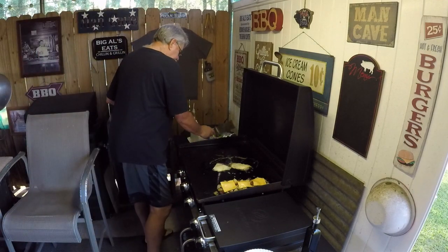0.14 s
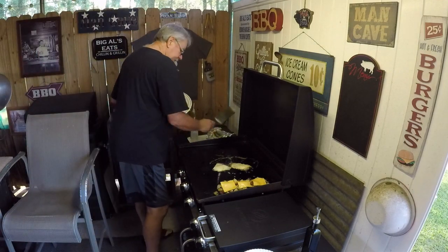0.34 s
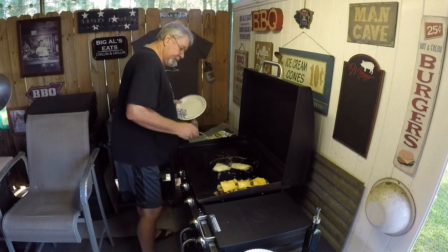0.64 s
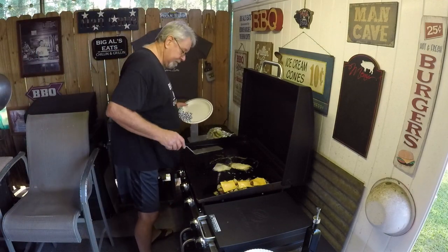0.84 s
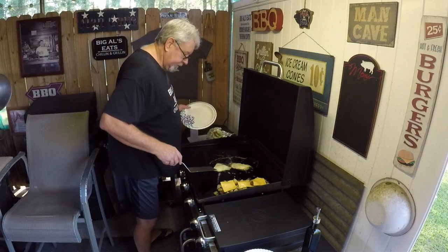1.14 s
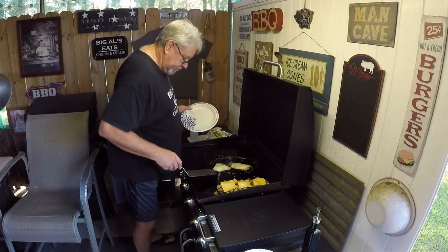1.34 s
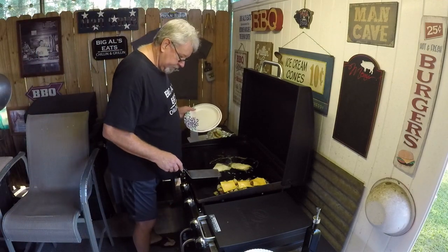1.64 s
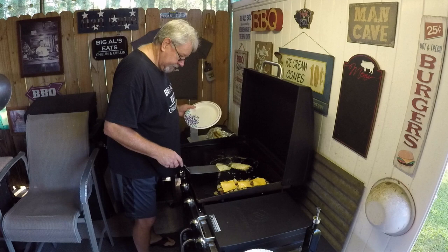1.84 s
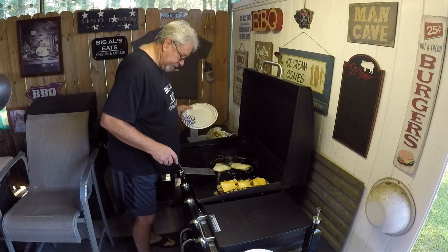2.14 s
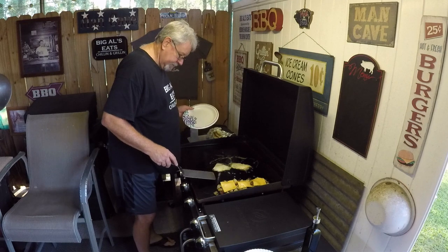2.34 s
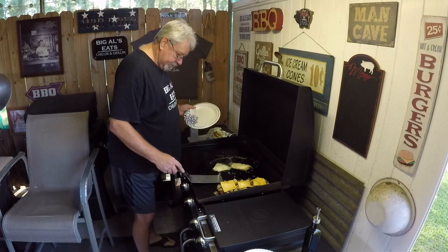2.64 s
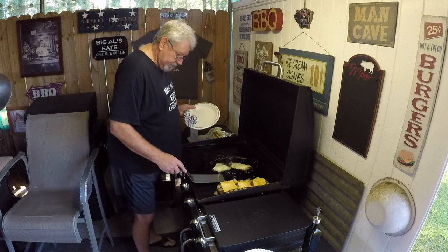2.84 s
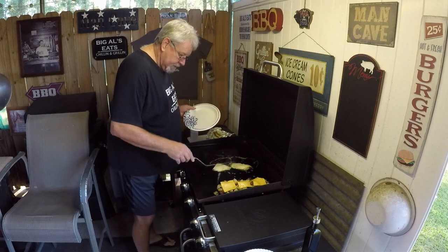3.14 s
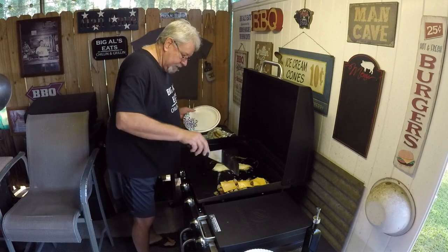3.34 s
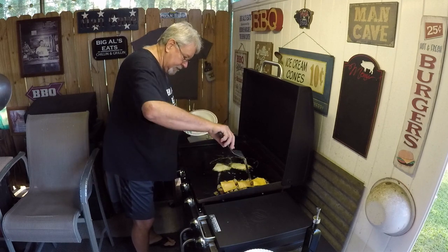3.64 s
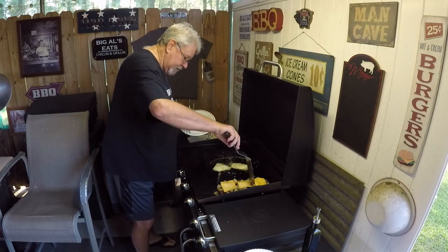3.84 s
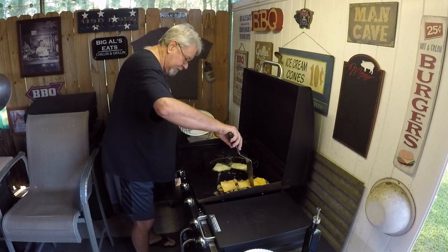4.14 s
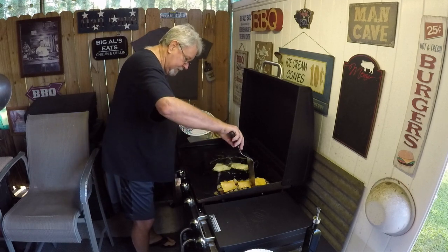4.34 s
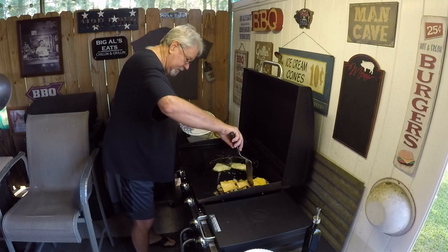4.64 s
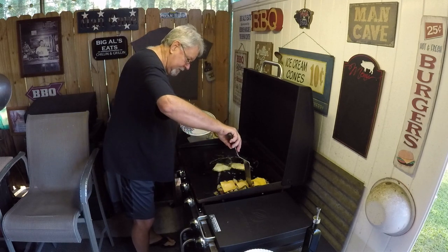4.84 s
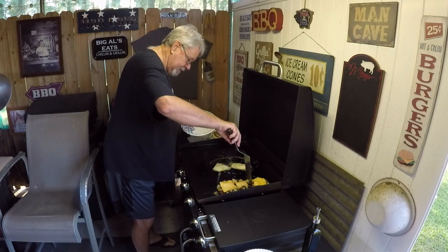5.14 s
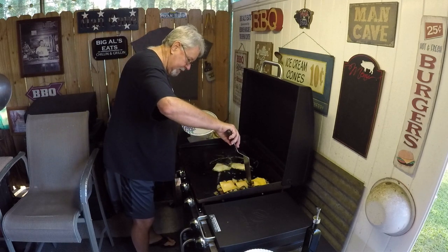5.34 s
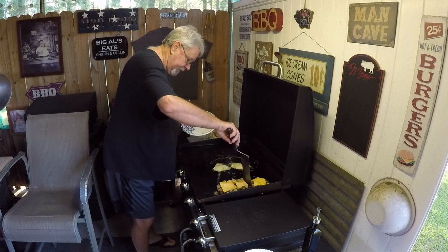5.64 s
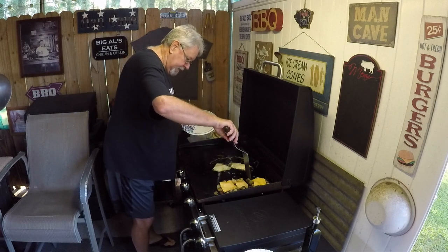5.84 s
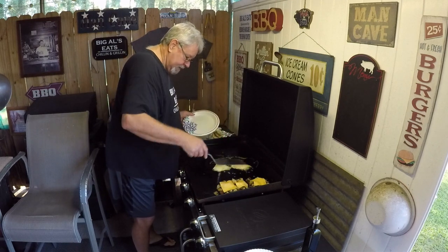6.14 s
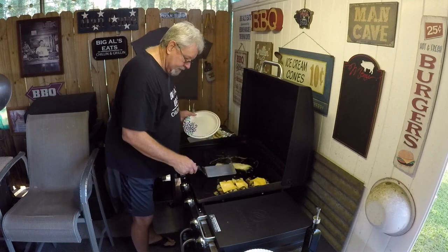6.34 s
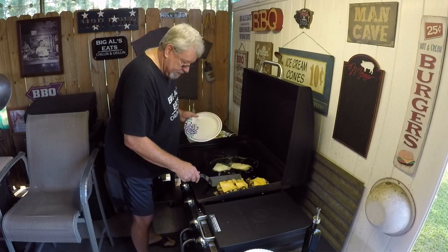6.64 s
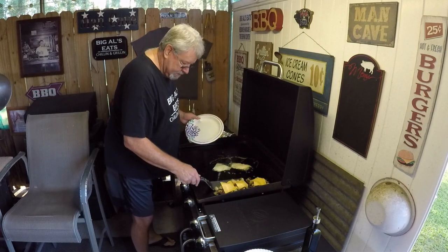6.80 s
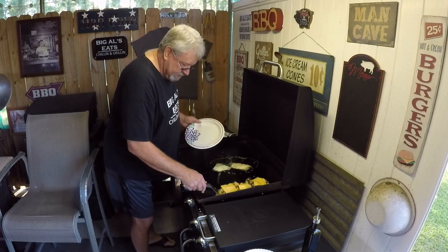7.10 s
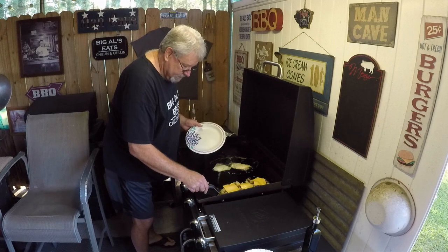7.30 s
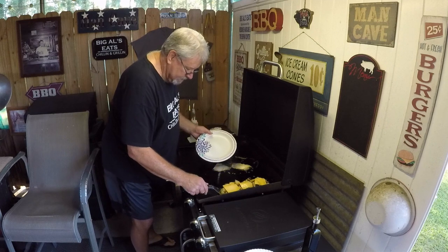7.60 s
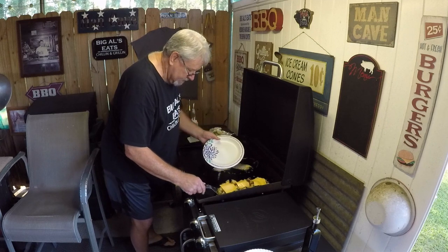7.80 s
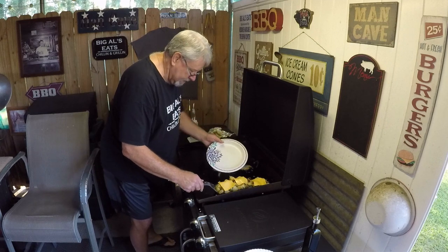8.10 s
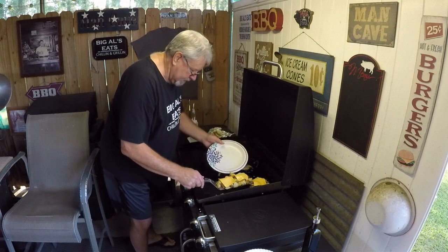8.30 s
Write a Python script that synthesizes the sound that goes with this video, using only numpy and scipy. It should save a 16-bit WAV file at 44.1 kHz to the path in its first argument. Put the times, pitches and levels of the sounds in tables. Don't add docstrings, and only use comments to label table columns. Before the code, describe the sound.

Low gas flame hum and crackling grease under a porch roof, broken by metal blade taps, gritty scrapes and hollow booms.

```python
import sys
import numpy as np
from scipy import signal
from scipy.fft import rfft, irfft, next_fast_len
from scipy.io import wavfile
from scipy.ndimage import uniform_filter1d, map_coordinates

SR = 44100
rng = np.random.default_rng(int(sys.argv[2]) if len(sys.argv) > 2 else 0)


def put_to_file(sound):
    columns = np.atleast_2d(sound).T
    safe = np.clip(columns, -1, 1)
    whole_steps = np.round(safe * 32767)
    wavfile.write(sys.argv[1], SR, whole_steps.astype(np.int16))


def decibels_to_gain(level_db):
    exponent = np.asarray(level_db, float) / 20
    return 10 ** exponent


N = 373086

# start of full pressure in seconds, seconds to gain 20 dB,
# seconds to lose 20 dB, rasp level in dB, sharpness of the edge in dB.
STROKES = [(2.538, .015, 0.1, -40.5, -8.5), (2.642, .01, .12, -36.5, -17), (4.738, .015, .06, -39, -12),
           (4.875, .06, .08, -43, -13), (6.416, 0.02, .09, -30, -3), (6.46, .03, .14, -28, -11),
           (6.56, .1, .15, -29.5, -9.5), (6.63, .13, 0.2234, -26, -10), (6.875, 0.11, .13, -25.5, -8.5),
           (7.12, .5, 0.14, -41, -6), (7.335, 0.2, .12, -47, -8)]
# pitch in Hz, level in dB, seconds to die by 60 dB.
FRONT = [(349.4, -12, 0.29), (545, 0.5, 0.32), (654, -10, 0.54), (713, -9.5, .43), (936, -14, .26),
         (1060, -20.5, .45), (1405, -26.5, .5)]
BACK = [(295.4, -12, .4), (370, -12, 0.45), (486, 0.5, .3), (742, -9.5, 0.57), (993, -16, 0.31),
        (1068, -23, 0.26), (1303, -27, .25), (1500, -31, .25), (1980, -32, .2)]
MIDDLE = [(443.4, 0, 0.47), (800, -9, 0.36), (1085, -14.5, .35), (1310, -19, .4), (1384, -16.5, .33),
          (1860, -23, .4), (2100, -24.5, 0.26)]
SHELL = [(360.4, -1, .28), (391.6, -2.5, 0.46), (559, 0, 0.44)]


def unit(x):
    return x / np.sqrt(np.mean(x ** 2) + 1e-20)


def along(points, hz):
    f, v = np.transpose(points)
    return np.interp(np.log(hz + 1), np.log(f + 1), v)


def curves(rows):
    s, *cols = np.transpose(rows)
    return np.array([np.interp(np.arange(N) / SR, s, c) for c in cols])


def wobble(rate, count=N):
    knots = rng.standard_normal(int(count * rate / SR) + 4)
    return map_coordinates(knots, [np.arange(count) * rate / SR])


def filtered(x, response):
    m = next_fast_len(N + 8192)
    return irfft(rfft(x, m) * response(np.fft.rfftfreq(m, 1 / SR)), m)[..., :N]


def peaks(modes, f):
    return np.sqrt(sum(decibels_to_gain(2 * db) / (1 + (2 * (f - hz) / w) ** 2) ** 2 for hz, w, db in modes))


def noise(patchy_db, size=8):
    z = signal.stft(rng.standard_normal((2, N)), nperseg=512)[2]
    field = uniform_filter1d(rng.standard_normal(z.shape[1:]), size, 0)
    field = uniform_filter1d(field, 8, 1)
    return signal.istft(z * decibels_to_gain(patchy_db * unit(field)), nperseg=512)[1][:, :N]


def grit(rate, spread_db, patchy_db):
    bumps = (rng.random(N) < rate / SR) * decibels_to_gain(spread_db * rng.exponential(size=N))
    grains = signal.lfilter([1], [1, -.97], bumps)
    return noise(patchy_db, size=2) * (1 + 0.31 * grains)


def taps():
    # start in seconds, peak in dB, brightness in dB, level of the free ring in dB,
    # seconds until it is damped.
    landings = [
        (2.5316, -29.5, -20, -1.5, 0.11),
        (2.6375, -28, -14, -7, .06),
        (4.7274, -36, -14, -13, .05),
        (6.4157, -22, -4, -6.5, .08),
    ]
    # pitch in Hz, level in dB, seconds to die by 60 dB.
    blade_tones = [(783, 2, .5), (1723, 1.5, 1.1), (2180, -18, 0.45), (2309, -11, .4), (2650, -11, .3),
                   (2940, -7, .2), (3260, -8, .15), (3774, -16, .3), (4797, -15, .15), (5900, -3, 0.14),
                   (6702, -16, .15), (9400, -18, .1)]
    out, t = np.zeros(N), np.arange(SR // 2) / SR
    for s, db, bright_db, ring_db, free in landings:
        ring = np.zeros(len(t))
        for hz, level, t60 in blade_tones:
            tone_db = level + rng.normal(0, 1.5) + (bright_db + 9.5) * np.log2(hz / 2000) / 2
            ring += decibels_to_gain(tone_db - 60 * t / t60) * np.sin(2 * np.pi * hz * t)
        damped = decibels_to_gain(ring_db - 60 * np.maximum(t - free, 0) / .06)
        jolt = decibels_to_gain(-60 * t / 0.037) * rng.standard_normal(len(t))
        dull = signal.lfilter(*signal.butter(1, [900, 4000], "band", fs=SR), jolt)
        crack = 1.3 * dull + 0.69 * decibels_to_gain(bright_db) * jolt
        out[round(s * SR):][:len(t)] += decibels_to_gain(db - 8) * (ring * damped + crack)
    return out


def pressure(peak_db, lingers):
    s, rise, fall = np.transpose(STROKES)[:3, :, None]
    late = np.arange(0, N, 16) / SR - s
    hold = 0.32
    drop = np.maximum(-late / rise, np.maximum(late / fall - hold, 0) / lingers)
    gains = decibels_to_gain(peak_db[:, None] - 20 * drop)
    return np.repeat(np.linalg.norm(gains, axis=0), 16)[:N]


def scrape():
    # pitch in Hz, width in Hz, level in dB.
    plate = [(1020, 80, 3), (1240, 50, -4), (1306, 44, 6), (1404, 52, 8.5), (1510, 88, 1.5), (1835, 77, 2),
             (1990, 50, -10), (2220, 44, -17), (2470, 72, -15.5)]
    blade = [(3400, 110, -2), (4340, 280, -5.5), (4800, 30, -4), (5100, 32, 2), (5320, 26, -15),
             (5610, 18, -14), (5700, 60, 0), (6370, 34, -4), (6690, 43, 1), (7470, 43, -1)]
    rasp_db, sharp_db = np.transpose(STROKES)[3:]
    rattle_db = rasp_db - 12 - 1.64 * sharp_db
    body = lambda f: peaks([(362, 154, -6), (553, 280, 0.0), (800, 240, -8.0)], f)
    rasp = lambda f: np.hypot(peaks(plate, f), peaks([(1190, 800, 0.0), (1890, 1340, -5.5)], f))
    edge = lambda f: np.hypot(peaks(blade, f), peaks([(3800, 3200, -4.0), (6400, 4300, -6.5)], f))
    judder = decibels_to_gain(1.3 * wobble(30))
    body_part = pressure(rattle_db, 2.7) * unit(filtered(grit(200, 1.9, 2.5), body))
    plate_part = pressure(rasp_db, 1) * judder * unit(filtered(grit(500, 1.2, 2.1), rasp))
    edge_part = pressure(rasp_db + sharp_db, 0.55) * judder * unit(filtered(grit(600, 1.2, 2.4), edge))
    return body_part + plate_part + edge_part


def booms():
    # start in seconds, level in dB, tilt in dB an octave about 500 Hz, rise in seconds,
    # panels that are woken.
    knocks = [(1.16, -12, 0, 0.014, SHELL[2:]), (2.637, -13, 1.5, .007, FRONT),
              (2.69, -14.5, -23, .012, FRONT), (2.735, -13.5, 2, .01, FRONT[1:]),
              (2.78, -14.5, 1, 0.0091, SHELL[2:]), (4.722, -9, -0.5, .008, BACK),
              (4.775, -18, -20, 0.013, BACK), (4.862, -13.5, 5.5, 0.014, BACK[:6]),
              (6.418, -13, 1, .006, MIDDLE), (6.457, -21, 8, .01, MIDDLE), (6.515, -22, -25, .012, SHELL),
              (6.585, -18, -12, 0.007, SHELL), (6.66, -12.5, 10, .02, SHELL), (6.73, -16, 6, .01, SHELL),
              (6.86, -26, 5, .02, MIDDLE[1:])]
    out, t = np.zeros(N), np.arange(SR // 2) / SR
    for s, db, tilt_db, rise, panels in knocks:
        for hz, level, t60 in panels:
            tone = np.sin(2 * np.pi * hz * t + 0.76 * wobble(29.8, len(t)))
            flutter = decibels_to_gain(2.74 * wobble(34.4, len(t))) * tone
            strength_db = db + level + tilt_db * np.log2(hz / 500)
            swell = decibels_to_gain(strength_db - 60 * t / t60) * (1 - np.exp(-t / rise))
            out[round(s * SR):][:len(t)] += swell * flutter
    return out


def fat():
    # frequency in Hz, level in dB per Hz.
    colour = [(1500, -18), (3000, -2.5), (4400, -6.5), (5200, 0.5), (7700, 0.5), (8100, -1.5), (10000, -5),
              (13000, -14.5), (15500, -34)]
    # time in seconds, level in dB.
    heat = [(0, -56), (5.2, -56), (5.7, -54), (6.3, -54.5), (6.7, -51.5), (7.3, -56), (8.46, -56.5)]
    # start in seconds, peak in dB, middle frequency in Hz, seconds to die by 60 dB, click in dB.
    spits = [(.74, -45, 5000, 0.11, -9), (1.44, -47, 3000, .1, -9), (2.06, -46, 3600, .08, -9),
             (3.15, -46, 3800, .06, -9), (3.66, -49.5, 5000, .1, -9), (4.595, -43, 7300, 0.13, -6),
             (5.048, -49, 6050, .12, -6), (5.17, -51, 8500, .2, -9), (5.502, -38, 7260, .12, 0),
             (5.546, -47.5, 7500, .3, -9), (5.843, -40, 5000, 0.059, -2), (5.97, -47, 6000, .08, -6),
             (6.113, -48, 7800, .1, 0), (6.19, -50, 10000, 0.055, -9), (7.53, -49, 6800, .12, -6),
             (7.748, -48, 7000, 0.11, -3)]
    sizzle = unit(filtered(grit(300, 1.1, 1.5), lambda f: decibels_to_gain(along(colour, f))))
    out = decibels_to_gain(curves(heat)[0] + 3.0 + 0.64 * wobble(6.9)) * sizzle
    t = np.arange(SR // 4) / SR
    snap = signal.butter(1, [2800, 8000], "band", fs=SR)
    for s, db, hz, t60, click_db in spits:
        swell = decibels_to_gain(3.5 * wobble(205, len(t)) - 60 * t / t60) * (1 - np.exp(-t / 0.0038))
        band = signal.butter(2, [0.77 * hz, 1.2 * hz], "band", fs=SR)
        puff = signal.lfilter(*band, rng.standard_normal((2, len(t))) * swell)
        burst = decibels_to_gain(click_db + 7 - 60 * t / 0.0065) * rng.standard_normal(len(t))
        click = signal.lfilter(*snap, burst)
        out[:, round(s * SR):][:, :len(t)] += decibels_to_gain(db) * (3 * puff + click)
    return out


def burner():
    # pitch in Hz, width in Hz, level in dB.
    casing = [(156.5, 20.5, -3.5), (206.8, 21.4, 0), (230.3, 22.2, -1), (295.7, 23, -9.5), (369, 18.6, -12),
              (474, 78, -15.5), (544, 52, -9), (604.4, 46, -11), (735, 33, -18.5)]
    # frequency in Hz, level in dB per Hz.
    air = [(100, -25), (135, -27), (260, -14), (500, -15.5), (800, -20.5), (1000, -27.5), (1500, -37.5),
           (1950, -41.5), (2500, -54), (3500, -54.5), (4500, -58), (6000, -71)]
    shape = lambda f: np.hypot(peaks(casing, f), decibels_to_gain(along(air, f)))
    level_db = -20 + 0.53 * wobble(2.505)
    return decibels_to_gain(level_db) * unit(filtered(noise(0.67), shape))


def porch(x):
    # frequency in Hz, seconds to die by 60 dB.
    fading = [(200, 0.47), (2000, 0.33), (10000, 0.18)]
    hz, t, z = signal.stft(rng.standard_normal((2, SR // 2)), SR, nperseg=256)
    tail = signal.istft(z * decibels_to_gain(-60 * t / along(fading, hz)[:, None]), SR, nperseg=256)[1]
    return signal.fftconvolve(np.atleast_2d(x), tail / np.linalg.norm(tail[0]), axes=1)[:, :N]


def scene():
    hits, drag = taps() + booms(), scrape()
    echoes = decibels_to_gain(-8.5) * porch(hits) + decibels_to_gain(-7) * porch(drag)
    return hits + drag + fat() + burner() + echoes


def low_pass(x):
    return signal.sosfilt(signal.butter(12, 15480, fs=SR, output="sos"), x)


def record(dry):
    # frequency in Hz, gain in dB.
    band = [(90, -46), (120, -17), (140, -5), (150, 0), (13000, -0.5), (14250, -6), (14400, -14),
            (15400, -24)]
    # frequency in Hz, level in dB per Hz.
    rumble_colour = [(20, -10), (45, -4), (60, 2), (75, -9), (110, 3.5), (150, -27), (200, -60)]
    # frequency in Hz, then gain in dB, phase in radians, likeness 0 to 1.
    notch = [(90, -1), (130, -2.6), (210, -3.5), (300, -5.4), (400, -9), (490, -14), (555, -17.5),
             (640, -13), (760, -8.5), (900, -4.5), (1500, -3.5), (2300, 0.96), (3200, -1), (12000, -1)]
    turn = [(100, 0.64), (300, -0.02), (450, -1.2), (550, -2), (650, -2.5), (1000, -3.5), (1400, -4),
            (2000, -4.5), (2700, -5), (7000, -6)]
    likeness = [(40, 1), (85, .6), (130, 1), (400, 0.96), (1000, 0.93), (1900, 0.85), (2600, 0.76),
                (4200, 0.98), (5500, 0.35), (7500, 0.08), (12000, .05)]
    dry = filtered(dry, lambda f: decibels_to_gain(along(band, f)))
    rumble = filtered(rng.standard_normal((2, N)), lambda f: decibels_to_gain(along(rumble_colour, f)))
    dry = dry + decibels_to_gain(-62) * unit(rumble)
    alike = lambda f: np.clip(along(likeness, f), 0, 1)
    gain = lambda f: decibels_to_gain(along(notch, f))
    shared = filtered(dry[0], lambda f: alike(f) * gain(f) * np.exp(1j * along(turn, f)))
    own = filtered(dry[1], lambda f: np.sqrt(1 - alike(f) ** 2) * gain(f))
    return low_pass(np.array([shared + own, dry[0]]))


dry = scene()
out = record(dry)
put_to_file(out)
```